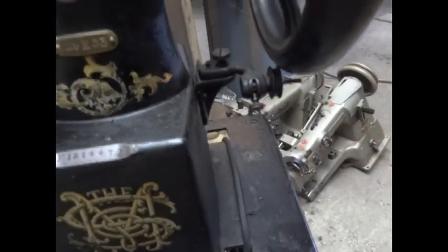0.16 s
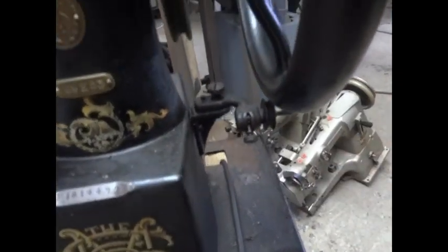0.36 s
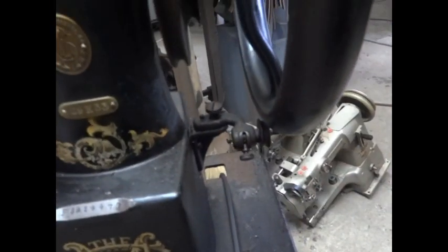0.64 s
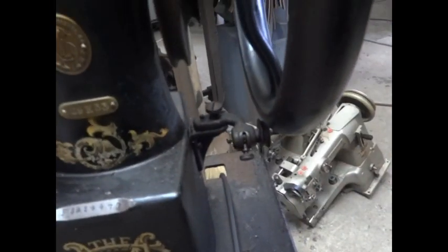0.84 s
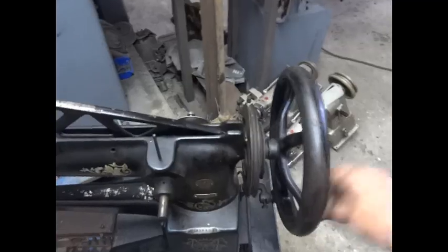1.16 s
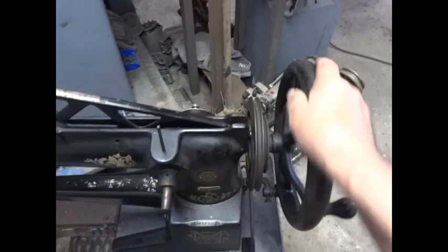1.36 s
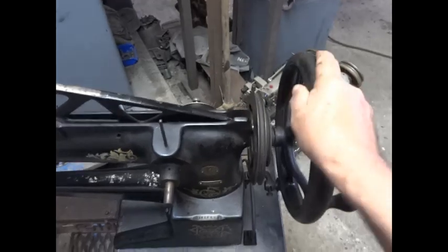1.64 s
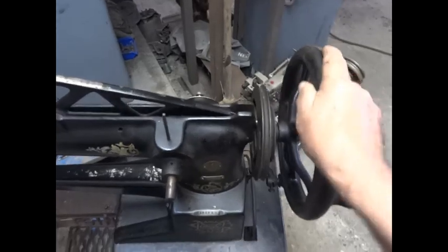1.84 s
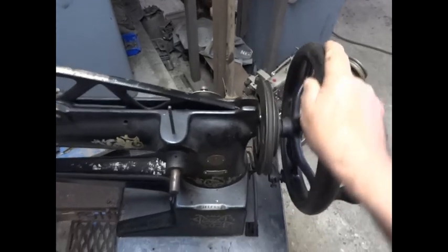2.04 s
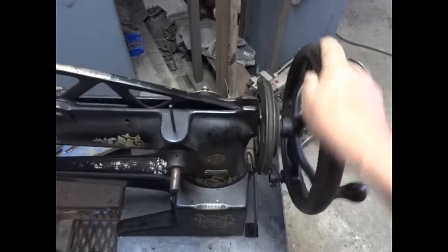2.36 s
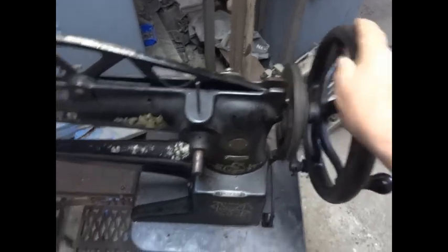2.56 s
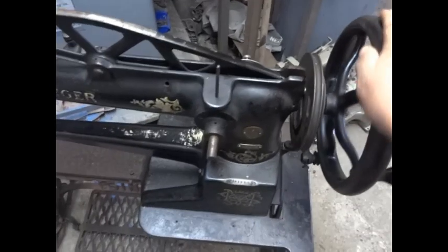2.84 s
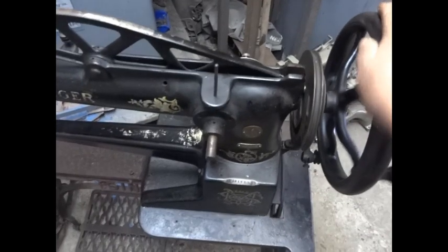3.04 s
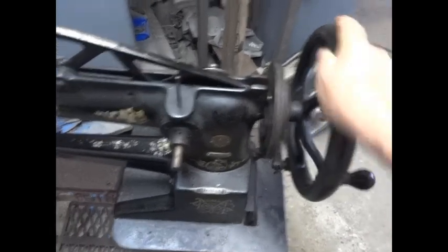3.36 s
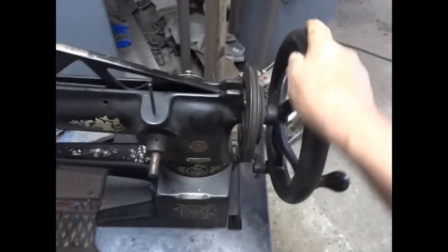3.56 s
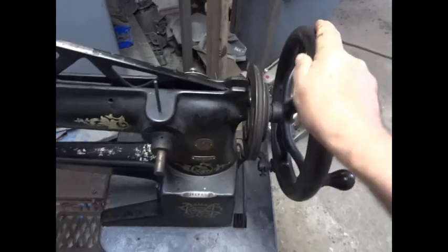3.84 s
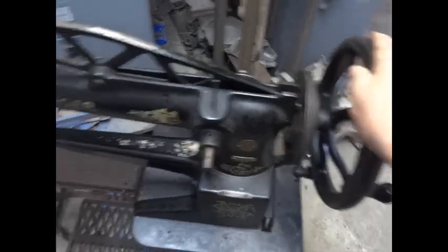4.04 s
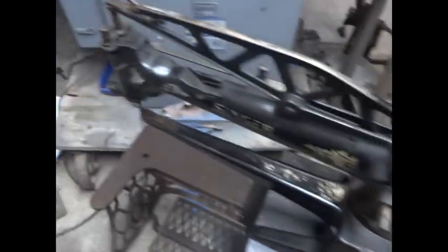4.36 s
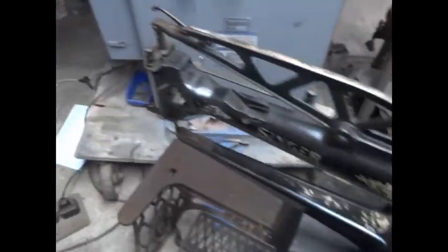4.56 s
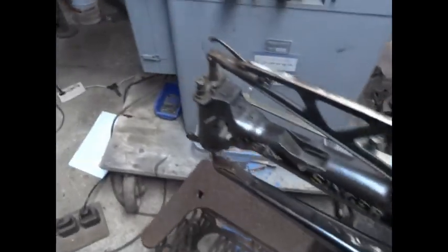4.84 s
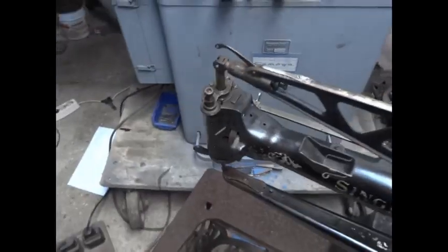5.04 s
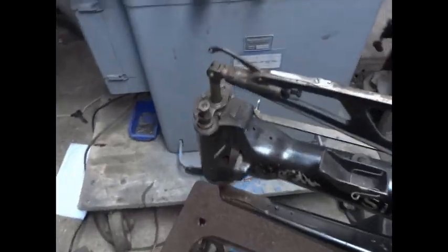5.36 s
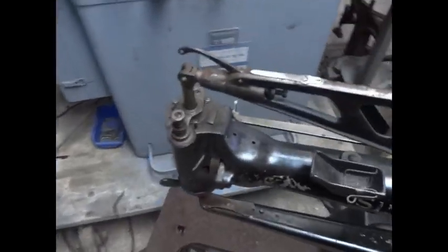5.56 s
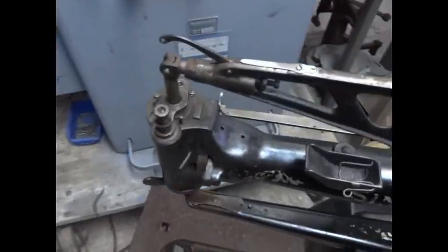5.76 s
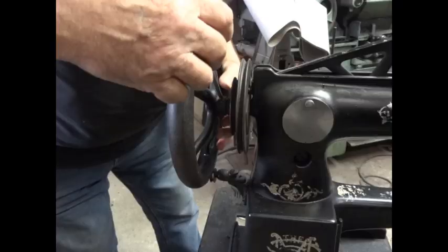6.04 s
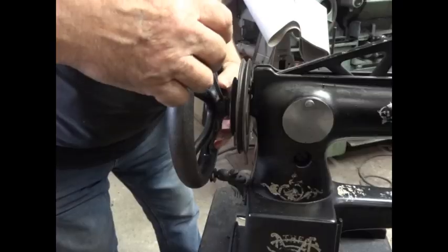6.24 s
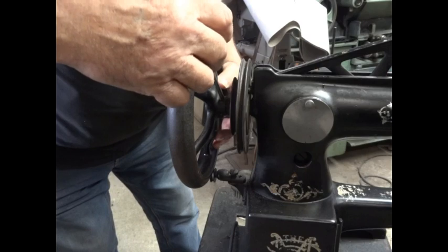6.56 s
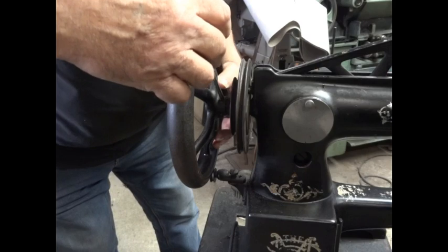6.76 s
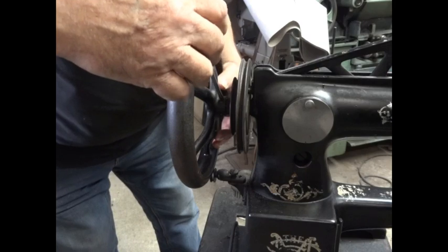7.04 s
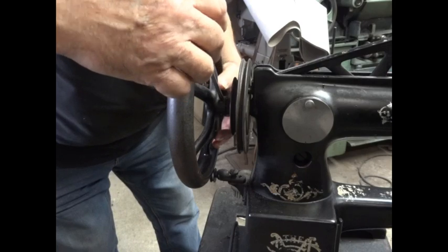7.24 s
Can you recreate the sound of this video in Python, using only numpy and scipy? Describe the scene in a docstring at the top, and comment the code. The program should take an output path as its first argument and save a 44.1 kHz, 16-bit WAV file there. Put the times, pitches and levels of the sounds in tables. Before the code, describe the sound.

From 0 to 0.6 s there is only very quiet workshop air, faint mains buzz and soft cloth rustle. A sharp bright tick at 0.6 s and several weaker ones follow. From 0.7 to 1.4 s a tiny slice of sound repeats as a faint, fuzzy, high stutter, fading while iron parts begin to slide. From about 1.4 s an old cast-iron sewing machine is turned by hand: gritty sliding until about 2.2 s, and hard mid-pitched knocks, irregular, roughly eight to ten a second, with short ringing, rebounds and loose rattles. Small lever clinks sit to the right from 3.5 to 4.4 s. Knocks ease after 3.7 s, with stronger ones at 4.5, 5.0 and 5.8 s. A last ringing knock at 5.9 s stutters rapidly until 6.2 s. Then abruptly duller, quiet air, a little cloth at 6.2 to 6.4 s, one short iron tap at 6.5 s, and near silence.

```python
"""Room air with mains overtones and rustling cloth opens the scene, with dry ticks and a stuck, fuzzy tone.
As it fades out, an old cast-iron sewing machine starts, turned by its handwheel in a workshop: parts slide,
cams and levers knock, loose parts rattle on, and sharp pushes and noise drive resonances of frame and stand.
A duller room follows, with cloth, a tick and one tap on iron; before each change one 40 ms frame repeats.
Air, cloth and hiss are shaped noise; buzz, fuzzy tone, ticks and ringing are sines."""
import sys
import numpy as np
from scipy import signal
from scipy.fft import rfft, irfft, next_fast_len
from scipy.io import wavfile
from scipy.ndimage import uniform_filter1d, map_coordinates

SR = 44100
rng = np.random.default_rng(int(sys.argv[2]) if len(sys.argv) > 2 else 0)


def inscribe(sig):
    """Save sig as 16-bit PCM at rate SR to the path in sys.argv[1].

    A 1-D sig is mono; a 2-D sig holds one channel per row.
    Samples are clipped to [-1, 1] before scaling.
    """
    pcm = np.round(np.clip(np.atleast_2d(sig).T, -1, 1) * 32767)
    wavfile.write(sys.argv[1], SR, pcm.astype(np.int16))


N = 326778
T = np.arange(N) / SR

# Colour of the opening room's air: [pitch_hz, gain_db]
AIR_FIRST = [(25, -38), (150, -25), (500, -6.5), (900, -2), (2000, -19), (5000, -13), (16000, -15)]
# Colour of the closing room's air: [pitch_hz, gain_db]
AIR_LAST = [(25, -36), (492, -9.5), (651, -9), (1260, -10), (11000, -27)]
# Air levels of the opening and the closing room: [level_db, level_db]
AIR_DB = -63, -58
# Mains overtones in the opening room, around which they waver: [pitch_hz, rms_level_db]
BUZZ_FIRST = [(802.1, -62.5), (1200, -71), (1599, -73), (2202, -76)]
# Mains overtones in the closing room: [pitch_hz, rms_level_db]
BUZZ_LAST = [(301.5, -75.5), (398.4, -79), (500.6, -71.5), (699.8, -74.5), (1249, -82)]
# Level curves of cloth and hands, one list for each room: [time_s, level_db]
RUSTLE = [
    [(0, -62), (.36, -61.5), (.4, -58), (.54, -61.5), (.575, -53.5), (.62, -59), (.74, -59)],
    [(6.18, -58.5), (6.3, -69), (6.37, -54.5), (6.42, -80)],
]
# Colour of the cloth noise: [pitch_hz, gain_db]
CLOTH = [(200, -22), (800, -1.5), (2200, 2), (3500, -3), (6000, -6), (12000, -17)]
# Left-right correlation of air, cloth and hiss: [pitch_hz, correlation_0_to_1]
ALIKE = [(60, 0.031), (240, 0.32), (950, 0.053), (3770, 0.38), (15000, 0.48)]
# Small dry ticks, each a tone with a noise puff: [start_s, level_db, pitch_hz, left_over_right_db]
TICKS = [(0.615, -24, 7360, -7.5), (0.654, -47, 1870, -1), (0.6834, -37, 2670, -8), (0.695, -36.5, 4740, 3),
         (5.8614, -39, 7140, -8), (6.2399, -46, 4500, -1)]
# Clinks of a small lever: [start_s, level_db]
LEVER = [(3.4995, -24.5), (3.8402, -26.5), (3.9686, -27), (4.0657, -28), (4.1656, -33), (4.2572, -32),
         (4.347, -28)]
# A tool taps the iron: start_s, then its partials [pitch_hz, level_db, t60_s]
TAP = (6.5365, [(1640, -16.5, 0.0017), (1634, -41, 0.082), (3200, -52, 0.25), (2880, -39, 0.0056),
       (5200, -44, 0.0024)])
# Short jumps while the opening room and the machine overlap: [start_s, level_db]
SEAMS = [(1.221, -27.5), (1.302, -27)]
# Level of the faint fuzzy tone in the repeated frame: [time_s, level_db]
FUZZY_TONE = [(.69, -95), (.72, -74)]
# The two stuck frames: [frame_start_s, repeats_end_s]
STALLS = [(.70, 1.40), (5.899, 6.181)]
# Fade-out of the opening room while the machine starts; the hiss fades in: [start_s, end_s]
ROOM_FADE = (1, 1.64)
# Parts sliding on each other: [start_s, rise_s, frame_db, stand_db, small_parts_db]
SLIDES = [(1.079, 0.012, -56.5, -63, -59), (1.109, 0.031, -59, -79, -49), (1.144, 0.021, -57, -54, -68),
          (1.218, 0.034, -56.5, -63.5, -50), (1.3, 0.037, -62.5, -66, -50), (1.372, 0.029, -57, -60, -42),
          (1.461, 0.011, -40, -51.5, -36), (1.542, 0.011, -38, -28, -51), (1.649, 0.025, -25, -23.5, -25.5),
          (1.853, 0.017, -22.5, -20, -27), (2.078, 0.028, -23, -23.5, -21.5), (3.25, 0.037, -37, -32, -43),
          (5.498, 0.016, -39, -36, -49.5)]
# Running noise of shafts and cams along the arm; the parts and left-right columns shape the knocks too:
# [time_s, frame_db, stand_over_frame_db, parts_over_frame_db, left_over_right_db, swung_round_0_to_1]
RUNNING = [(1.42, -42.5, 4, -11, 1, 0.2), (1.68, -39.5, 1, -6.5, 0, 0.12), (2.3, -42, 3.5, -6, 0, 0),
           (3.32, -36, -2.5, -11.5, -1.5, 0), (3.79, -47.5, 3.5, -9.5, -0.5, 0.05),
           (4.8, -43.5, 1.5, -14.5, -1, 0.13), (5.31, -51.5, 1.5, -12.5, -2, 0),
           (5.8, -48.5, 3, -16, -6, 0.7), (5.9, -46.5, 3, -9, -6, 1)]
# Knocks of the mechanism: [start_s, level_db, struck_pitch_hz, relative_rattle_db, stand_share_db]
KNOCKS = [(1.4214, -19.5, 2234, -18, -7.5), (1.4541, -30.5, 2050, 3, -4), (1.4663, -19, 1970, -19.5, 0),
          (1.51, -19, 1240, -23, -2), (1.5279, -10, 2230, -8, -16), (1.633, -8.5, 2320, -3, -10),
          (1.7841, -7, 2600, -9, -11.5), (1.8645, -8, 2170, -25, -12), (1.982, -5, 2860, -12, -13.5),
          (1.995, -13, 2180, -12, -3.5), (2.0661, -9.5, 1270, -4.5, -7.5), (2.2236, -22.5, 1240, 0.5, -6),
          (2.3107, -9, 2500, -15, -14), (2.384, -19, 2090, -4, -5), (2.4384, -5.5, 2300, -12.5, -11.5),
          (2.562, -7.5, 2540, -17, -10.5), (2.652, -20.5, 1260, -11, -8), (2.6915, -11, 2340, -20, -11),
          (2.7671, -22.5, 1210, -2, -2.5), (2.8075, -7, 2220, -9.5, -9.5), (2.892, -21.5, 1210, -12, 1.5),
          (2.9322, -13.5, 2130, -20, -6.5), (3.017, -15, 1550, -13, -11), (3.04, -15, 1250, -4, -8),
          (3.0582, -8, 3890, -12, -10), (3.1819, -7.5, 2550, -12, -10), (3.2826, -15.5, 1240, -8.5, -7.5),
          (3.3033, -8.5, 2450, -9.5, -11.5), (3.3842, -11, 1230, -25, -9), (3.4353, -16, 2180, -12, -6),
          (3.5703, -11, 2300, -13.5, -8), (3.7537, -17, 2110, -7.5, -8), (3.8183, -25, 1240, -4.5, -2.5),
          (3.871, -32, 1960, -12.5, 2), (3.9816, -16, 2200, -15, -12), (4.006, -20, 1400, -9, -4),
          (4.1027, -13.5, 2100, -15.5, -10.5), (4.1704, -28.5, 2250, 0, -7.5),
          (4.2156, -21, 2210, -34, -8.5), (4.2984, -22, 2140, -20.5, -5.5),
          (4.356, -13.5, 2190, -12.5, -12), (4.4528, -24.5, 1240, -12, -5.5), (4.5257, -10, 2220, -13, -12),
          (4.6317, -11, 2090, -4, -14.5), (4.6838, -18, 2200, -7, -10), (4.791, -19, 1200, -10, -7.5),
          (4.805, -14, 2070, -19, -10), (4.8796, -17, 2100, -10.5, -10), (5.026, -9, 2340, -13, -15),
          (5.0714, -18, 2220, -10, -10), (5.1924, -16, 2160, -23, -9.5), (5.2963, -28.5, 2450, -12.5, -19),
          (5.3752, -21, 1600, -10.5, -6), (5.493, -34, 2100, -16, 4.5), (5.5892, -28.5, 1410, -1.5, -9),
          (5.6065, -14, 1950, -11.5, -3.5), (5.693, -19.5, 1210, -21.5, -4.5),
          (5.81, -10.5, 1930, -18, -8.5), (5.9007, -18.5, 2270, -28, -12)]
# Extra push of the first contact on frame, stand and small parts: one row each [over_knock_level_db]
CRACK_DB = [
    [6],
    [7.5],
    [18.5],
]
# Resonances of stand and table; struck ringing dies 1.7 times faster: [pitch_hz, width_hz, level_db]
STAND = [(383, 11, -7), (470, 26, -11), (536, 7.6, -13), (628, 21, 4.5), (779.7, 11.6, 5), (840, 17, 3),
         (894, 13.7, 6)]
# Resonances of the cast-iron arm, same rule: [pitch_hz, width_hz, level_db]
FRAME = [(1253, 17.5, 2.5), (1612, 32, 4.5), (2015, 18.7, -0.5), (2232, 43.6, 11), (2616, 34, 0.5),
         (2930, 29, 4.5), (3338, 30.5, 4.5), (3645, 13, 1.5), (3890, 46, 10), (4530, 56, 3)]
# Resonances of the small steel parts, same rule: [pitch_hz, width_hz, level_db]
PARTS = [(6130, 59, 3), (6970, 520, 4.5), (8000, 1100, -2.5), (8940, 53, 3.5)]
# Shared colour of the many weak modes, raised separately for each body: [pitch_hz, relative_level_db]
BROAD = [(150, -30.5), (300, -10.5), (775, 4), (1100, -7.5), (1840, -6), (3500, -10), (5430, -14),
         (7000, -10), (10000, -23.5), (16000, -36)]
# Modes of the sewing head under the last knock: [pitch_hz, relative_level_db, t60_s]
HEAD = [(376, -7, 0.15), (423, -9, .12), (773, 2, 0.054), (857, 0.5, 0.086), (1083, -13, 0.11),
        (1218, -13.5, 0.1), (1998, -12, .06), (2243, -11, 0.045), (2870, -6, .025), (4560, -18, 0.055)]
# Side level of the machine, since its parts lie apart: [pitch_hz, gain_db]
SPREAD = [(300, -35), (1000, -30), (2500, -5), (12000, -2.5)]
# Phase lead of left over right, reversed when swung round: [pitch_hz, phase_rad]
LEAD = [(1000, 0), (1900, -0.15), (3450, -1.3), (7580, -1.3), (11700, 0.2)]
# Colour of the low handling rumble: [pitch_hz, gain_db]
HANDLING = [(30, 0), (80, 1), (200, 7.5), (400, -59)]
# Decay time of the workshop's answer: [pitch_hz, t60_s]
SHOP = [(200, 0.15), (2000, 0.22), (10000, 0.2)]
# Share of the workshop's answer under the machine: [pitch_hz, gain_db]
WET = [(400, -47), (1000, -8.5), (3000, -7.5), (12000, -11)]
# Colour of the hiss under the running machine: [pitch_hz, gain_db]
HISS = [(6500, -21), (11000, 4.5), (16000, 3.5)]

TICK_T60_S = 0.0098
LEVER_HZ, LEVER_T60_S, LEVER_PAN_DB = 3780, 0.034, -11
FUZZY_HZ, OVERTONE_DB = 4850, 0
FRAME_S = 0.04  # length of a stuck frame
FAINT_DB = -66  # level of faint noise added over the first repeats
UNLOOPED_DB = -8  # level of a quieter unlooped copy under the second repeats
FRAME_DB, PARTS_DB = -4.5, -3  # share of each knock in frame and small parts
BLOW_RISE_S, CONTACT_HZ = 0.0013, 5750  # the first contact lasts too long to push much above this pitch
RATTLE_S, RATTLE_WAIT_S = 0.014, 0.00063  # swell and wait of the rattle
RATTLE_GRAIN_S, RATTLE_ROUGH_DB = 0.00301, 2  # spacing and unevenness of its contacts
REBOUND_S, REBOUND_DB = 0.015, -4.5  # the lever lands once more
LOOSE_DB, LOOSE_WAIT_S = 1, 0.022  # loose parts: level over the rattle, mean spacing
HEAD_S, HEAD_DB = 5.9012, -18
HISS_DB, CLATTER_DB, HISS_FOLLOWS = -54, -31, 0.5  # hiss at this clatter level; dB per dB of clatter
LAST_TOP_HZ, TOP_HZ = 11000, 15900  # top of the closing room, top of everything


def amp(db):
    """Decibels to amplitude."""
    return 10 ** (np.asarray(db) / 20)


def unit(x):
    """Scale to an rms of 1."""
    return x / np.sqrt(np.mean(x ** 2) + 1e-20)


def along(points, hz):
    """Read a curve of (pitch, value) points on a log pitch axis."""
    f, v = np.transpose(points)
    return np.interp(np.log(hz + 1), np.log(f + 1), v)


def curves(rows):
    """One value per sample for each column after the time."""
    s, *cols = np.transpose(rows)
    return [np.interp(T, s, c) for c in cols]


def wobble(rate):
    """A smooth random curve with rate knots a second."""
    return map_coordinates(rng.standard_normal(int(N * rate / SR) + 4), [T * rate])


def filtered(x, response):
    """Filter x by a complex response of frequency."""
    m = 2 * next_fast_len(N // 2 + SR // 4)
    return irfft(rfft(x, m) * response(np.fft.rfftfreq(m, 1 / SR)), m)[..., :N]


def sides(pan_db):
    """Left and right gains for a left-over-right level."""
    return amp(np.array([pan_db / 2, -pan_db / 2]))


def rush(spectrum, patchy_db):
    """Stereo noise of rms 1 with smooth random patches in time and pitch, coloured and partly alike."""
    z = signal.stft(rng.standard_normal((2, N)), nperseg=512)[2]
    field = uniform_filter1d(rng.standard_normal(z.shape[1:]), 6, 0)
    field = uniform_filter1d(field, 14, 1)
    pair = signal.istft(z * amp(patchy_db * unit(field)), nperseg=512)[1][:, :N]

    def mid_side_response(hz):
        angle = np.arccos(np.clip(along(ALIKE, hz), -1, 1)) / 2
        return amp(along(spectrum, hz)) * [np.cos(angle), np.sin(angle)]

    mid, side = filtered(pair, mid_side_response)
    return unit(np.array([mid + side, mid - side]))


def mains_buzz(overtones):
    """Mains overtones as sines whose levels waver slightly."""
    out = np.zeros(N)
    for hz, db in overtones:
        level = np.sqrt(2) * amp(db + 1.2 * wobble(14))
        out += level * np.sin(2 * np.pi * (hz * T + rng.random()))
    return out


def room_tone(air, air_db, buzz, rustle):
    """Steady air noise, mains buzz and the rising and falling noise of rustling cloth."""
    cloth = amp(curves(rustle)[0]) * rush(CLOTH, patchy_db=2.5)
    return amp(air_db) * rush(air, patchy_db=1.5) + mains_buzz(buzz) + cloth


def ticks():
    """Short decaying sines make ticks, lever clinks and a tap; the ticks add a puff of bright noise."""
    out, t = np.zeros((2, N + SR)), np.arange(SR // 5) / SR

    def place(s, sound):
        out[:, round(s * SR):][:, :len(t)] += sound

    for s, db, hz, pan_db in TICKS:
        # the puff's own decay comes on top of the tick's
        puff = 2.1 * amp(-60 * t / 0.023) * rng.standard_normal(len(t))
        snap = (np.sin(2 * np.pi * hz * t) + puff) * (1 - np.exp(-t / 0.000091))
        place(s, amp(db - 60 * t / TICK_T60_S) * snap * sides(pan_db)[:, None])
    for s, db in LEVER:
        hz = LEVER_HZ * (1 + 0.026 * rng.standard_normal())
        clink = np.sin(2 * np.pi * hz * t) * (1 - np.exp(-t / 0.0012))
        place(s, amp(db - 60 * t / LEVER_T60_S) * clink * sides(LEVER_PAN_DB)[:, None])
    tap_s, partials = TAP
    place(tap_s, sum(amp(db - 60 * t / t60) * np.sin(2 * np.pi * hz * t) for hz, db, t60 in partials))
    # thin out the bass and soften the top
    out = filtered(out[:, :N], lambda hz: (1j * hz / (900 + 1j * hz)) ** 3 / (1 + 1j * hz / 9000))
    for s, db in SEAMS:
        out[:, round(s * SR):][:, :3] -= amp(db)  # three samples long
    return out


def shop(x):
    """The workshop's answer: stereo noise in which each pitch dies at its own speed."""
    hz, t, z = signal.stft(rng.standard_normal((2, SR // 2)), SR, nperseg=256)
    decay = amp(-60 * t / along(SHOP, hz)[:, None])
    tail = signal.istft(z * decay, SR, nperseg=256)[1]
    delayed = np.pad(x, ((0, 0), (200, 0)))
    return signal.fftconvolve(delayed, tail / np.linalg.norm(tail[0]), axes=1)[:, :N]


def fuzzy_tone():
    """A faint sine and its third harmonic, made fuzzy by fast wander in pitch and level."""
    phase = 2 * np.pi * np.cumsum(FUZZY_HZ + 80 * wobble(300)) / SR
    tone = np.sin(phase) + amp(OVERTONE_DB) * np.sin(3 * phase)
    return amp(curves(FUZZY_TONE)[0] + 2 * wobble(40)) * tone


def stalled(x, start, end):
    """From start to end one frame plays again and again, its end blended into its start."""
    i, first, size = np.arange(N), round(start * SR), round(FRAME_S * SR)
    at = np.where((i >= first) & (i < end * SR), first + (i - first) % size, i)
    blend = np.clip((at - first - size) / 90 + 1, 0, 1) * (i < end * SR) * (at < first + size)
    return x[:, at] * (1 - blend) + x[:, at - size] * blend


def swell(t, rise):
    """Up in rise seconds, then dying away."""
    u = t / np.clip(rise, .003, .06)
    return u * np.exp(1 - u)


def slides():
    """Friction power that swells and fades in frame, stand and parts."""
    power, t = np.zeros((3, N + SR)), np.arange(SR // 4) / SR
    for s, rise, *levels_db in SLIDES:
        power[:, round(s * SR):][:, :len(t)] += (amp(levels_db)[:, None] * swell(t, rise)) ** 2
    return power[:, :N]


def running_noise(frame_db, stand_share_db, parts_share_db):
    """Power of turning shafts and cams, with loose parts chattering in random bursts of milliseconds."""
    chance = rng.random((2, 3, N))
    hits = (chance[0] < 45 / SR) * 14 * chance[1] ** 2  # about 45 a second in each body
    chatter = signal.lfilter([1], [1, -np.exp(-1 / (0.00083 * SR))], hits)
    levels_db = frame_db + np.array([0 * T, stand_share_db, parts_share_db])
    return amp(2 * levels_db) * (1 + chatter) * amp(0.36 * wobble(3.7)) * (T > RUNNING[0][0])


def ringing(modes, t, near_hz=None):
    """One blow rings the modes at new strengths, most of all those near the struck pitch."""
    hz, width, db = np.transpose(modes)[..., None]
    luck = rng.standard_normal((3, len(modes), 1))
    if near_hz:
        db = db - 13 * np.abs(np.log2(hz / near_hz))
    strength = amp(db + 4.5 * luck[0])
    decay = np.exp(-np.pi * 1.7 * width * t)
    tones = np.sin(2 * np.pi * hz * (1 + 0.013 * luck[1]) * t) * np.sign(luck[2])
    waves = strength * decay * tones
    return waves.sum(0) / np.linalg.norm(strength) * (1 - np.exp(-t / 0.00093))


def loose_parts(ring, i, hz, rattle_db, gains):
    """Four loose parts strike singly after a blow, at random waits, pitches and falling sizes."""
    t = np.arange(SR // 20) / SR
    waits = np.cumsum(rng.exponential(size=4)) * LOOSE_WAIT_S
    for wait, luck in zip(waits, rng.standard_normal((4, 2))):
        size = amp(rattle_db + LOOSE_DB - 53 * wait + 6.4 * luck[0])
        iron = gains[0] * ringing(FRAME + PARTS[:2], t, near_hz=hz * 2.5 ** luck[1])
        ring[i + round((wait + .004) * SR):][:len(t)] += size * (iron + gains[1] * ringing(STAND, t))


def knocks(parts_share_db):
    """Each knock gives a sharp contact, a blow and rattle as noise power, and a ring that rebounds."""
    t = np.arange(SR // 4) / SR
    short = t[:SR // 9]
    power, crack, ring = np.zeros((3, N + SR)), np.zeros((3, N)), np.zeros(N + SR)
    # frame, stand, parts: the stand takes a softer, longer push
    push = amp(-60 * t / np.array([[.012], [.025], [.008]]))
    blow = 1.15 * push * (1 - np.exp(-t / BLOW_RISE_S))
    for s, db, hz, rattle_db, stand_db in KNOCKS:
        i = round(s * SR)
        again = round((s + REBOUND_S * (1 + 0.147 * rng.standard_normal())) * SR)
        gains = amp(db + np.array([[FRAME_DB], [stand_db], [PARTS_DB + parts_share_db[i]]]))
        grains = np.interp(t, np.arange(64) * RATTLE_GRAIN_S, rng.standard_normal(64))
        envelope = swell(np.clip(t - RATTLE_WAIT_S, 0, 1), RATTLE_S)
        rattle = amp(rattle_db - 4.5) * amp(RATTLE_ROUGH_DB * grains) * envelope
        power[:, i:][:, :len(t)] += (gains * (blow + rattle)) ** 2
        crack[:, [i]] = gains * amp(CRACK_DB)
        modes = [ringing(FRAME, short, near_hz=hz), 0.92 * ringing(STAND, short)]
        ring[i:][:len(short)] += amp(2.5) * (gains[:2] * modes).sum(0)
        rebound = gains[1] * ringing(STAND, short) + gains[0] * ringing(FRAME, short, near_hz=hz)
        ring[again:][:len(short)] += amp(REBOUND_DB) * rebound
        loose_parts(ring, i, hz, rattle_db, gains)
    return power[:, :N], crack, ring[:N]


def gritty(shape, rough_db):
    """Noise whose size jumps every 40 samples, about a millisecond, as many small contacts do."""
    size = amp(rough_db * rng.standard_normal(shape[:-1] + (shape[-1] // 40 + 1,)))
    return unit(rng.standard_normal(shape) * np.repeat(size, 40, -1)[..., :shape[-1]])


def body(modes, lo_hz, hi_hz, broad_db):
    """Resonances over a broad colour inside one band, causal, unit gain for white noise."""
    def shape(f):
        ring = sum(amp(2 * db) * (f * w) ** 2 / ((c * c - f * f) ** 2 + (f * w) ** 2)
                   for c, w, db in modes)
        band = 1 / ((1 + (lo_hz / (f + 1)) ** 12) * (1 + (f / hi_hz) ** 12))
        ring = ring * band ** 0.29 / (1 + (330 / (f + 1)) ** 8)
        broad = amp(2 * (along(BROAD, f) + broad_db)) * band
        # fold the cepstrum so that the response starts at once (minimum phase)
        ceps = irfft(np.log(ring + broad + 1e-12) / 2)
        ceps[1:len(ceps) // 2] *= 2
        ceps[len(ceps) // 2 + 1:] = 0
        h = np.exp(rfft(ceps))[:len(f)]
        return h / np.sqrt(np.mean(np.abs(h) ** 2))
    return shape


def handling_rumble(mid):
    """Low handling rumble, different left and right, as noise that swells with the machine's level."""
    level = np.sqrt(np.abs(uniform_filter1d(mid ** 2, SR // 8))) ** 0.56
    rumble = filtered(rng.standard_normal((2, N)), lambda hz: amp(along(HANDLING, hz)))
    return amp(-54.5) * level * unit(rumble)


def sewing_head():
    """The last knock rings the now nearest sewing head as decaying sines."""
    out, t = np.zeros(N + SR), np.arange(SR // 4) / SR
    modes = sum(amp(db - 60 * t / t60) * np.sin(2 * np.pi * hz * t) for hz, db, t60 in HEAD)
    out[round(HEAD_S * SR):][:len(t)] += amp(HEAD_DB) * modes * (1 - np.exp(-t / 0.00044))
    return out[:N]


def machine():
    """Slides, running noise and knocks drive the resonances of frame, stand and parts; struck rings join."""
    frame_db, stand_share_db, parts_share_db, pan_db, swung = curves(RUNNING)
    knock_power, crack, ring = knocks(parts_share_db)
    power = slides() + running_noise(frame_db, stand_share_db, parts_share_db) + knock_power
    # axes: body, mid or side, time
    force = np.sqrt(power)[:, None] * gritty((3, 2, N), rough_db=2.5)
    force[:, 0] += filtered(crack, lambda hz: 1 / (1 + 1j * hz / CONTACT_HZ) ** 2)
    mid, side = (filtered(force[0], body(FRAME, lo_hz=1140, hi_hz=5660, broad_db=16.0))
                 + filtered(force[1], body(STAND, lo_hz=27.0, hi_hz=1260, broad_db=6.0))
                 + filtered(force[2], body(PARTS, lo_hz=3900, hi_hz=17900, broad_db=13.0)))
    # the struck rings carry little bass below about 260 Hz
    mid = mid + filtered(ring + sewing_head(), lambda hz: (1j * hz / (260 + 1j * hz)) ** 8)
    side = filtered(side, lambda hz: amp(along(SPREAD, hz)))
    pair = np.array([mid + side, mid - side]) * sides(pan_db)

    def led(way):
        return filtered(pair, lambda hz: np.exp(way * .5j * along(LEAD, hz) * [[1], [-1]]))

    swung = np.clip(swung, 0, 1)
    return led(1) * (1 - swung) + led(-1) * swung + handling_rumble(mid)


def hiss(iron):
    """Bright noise that grows with the clatter, mostly alike left and right."""
    clatter = np.abs(uniform_filter1d(iron.mean(0) ** 2, round(.005 * SR)))
    clatter_db = 10 * np.log10(clatter + 1e-9)
    apart, alike = rush(HISS, patchy_db=2), rush(HISS, patchy_db=2)[0]
    level_db = HISS_DB + HISS_FOLLOWS * (clatter_db - CLATTER_DB) + 3 * wobble(25)
    return amp(level_db) * (0.4 * apart + alike)


def scene():
    """A quiet room fades out while the machine starts; a duller room follows."""
    first_stall, second_stall = STALLS
    small = ticks()
    first = room_tone(AIR_FIRST, AIR_DB[0], BUZZ_FIRST, RUSTLE[0]) + fuzzy_tone()
    faint = amp(FAINT_DB) * rush(AIR_FIRST, patchy_db=-0.5) * (T > first_stall[0] + FRAME_S)
    fade = np.clip((ROOM_FADE[1] - T) / (ROOM_FADE[1] - ROOM_FADE[0]), 0, 1)
    opening = (stalled(first, *first_stall) + faint) * fade

    iron = machine()
    second = iron + filtered(shop(iron), lambda hz: amp(along(WET, hz)))
    repeated = stalled(second, *second_stall)
    unlooped = amp(UNLOOPED_DB) * second * (T > second_stall[0] + FRAME_S)
    joined = opening + hiss(repeated) * (1 - fade) + repeated + unlooped + small

    last = room_tone(AIR_LAST, AIR_DB[1], BUZZ_LAST, RUSTLE[1])
    last = last + (small + amp(-9.0) * shop(small)) * (T > second_stall[1])
    before = np.clip((second_stall[1] - T) / 0.002, 0, 1)  # a 2 ms change
    return joined * before + filtered(last * (1 - before), lambda hz: hz < LAST_TOP_HZ)


def record(dry):
    """Nothing sounds above the band limit."""
    return filtered(dry, lambda hz: hz < TOP_HZ)


dry = scene()
out = record(dry)
inscribe(out)
```